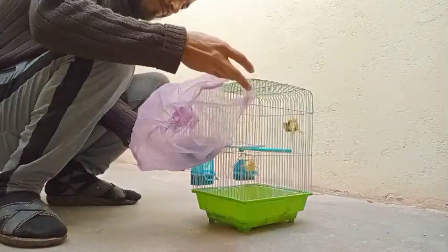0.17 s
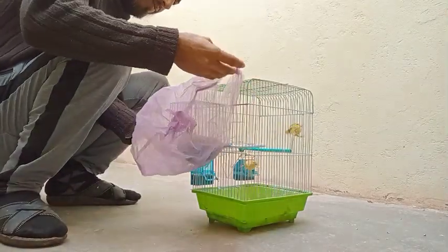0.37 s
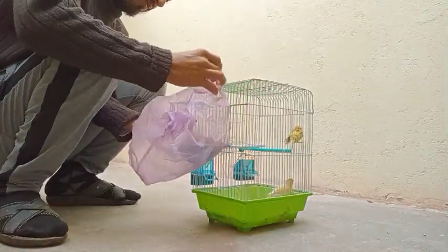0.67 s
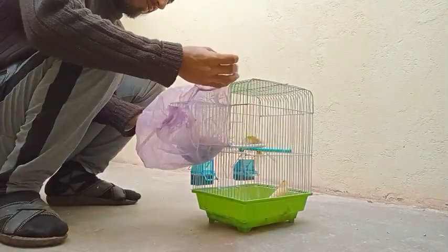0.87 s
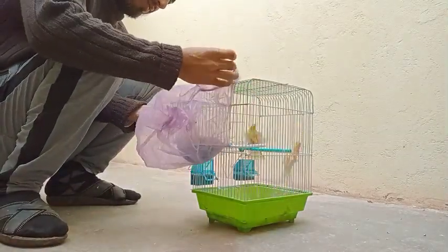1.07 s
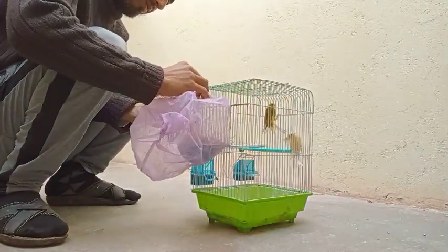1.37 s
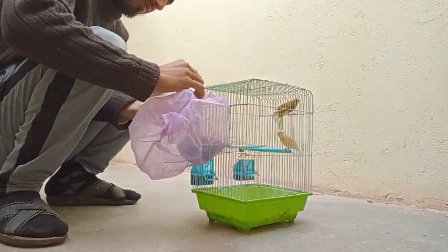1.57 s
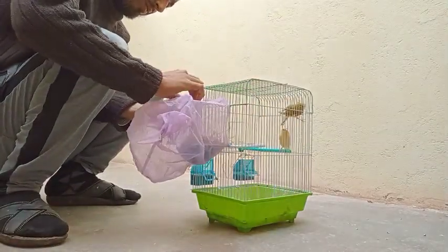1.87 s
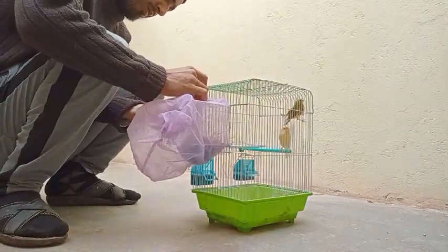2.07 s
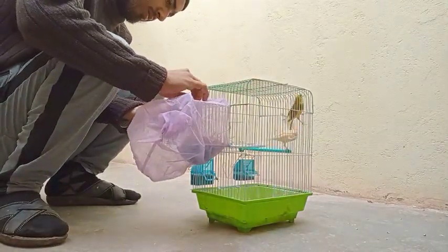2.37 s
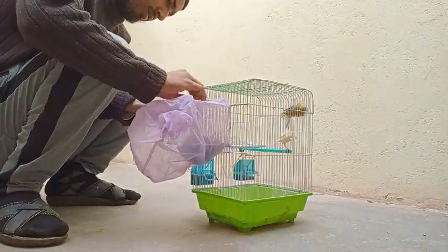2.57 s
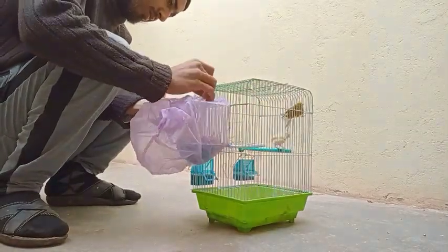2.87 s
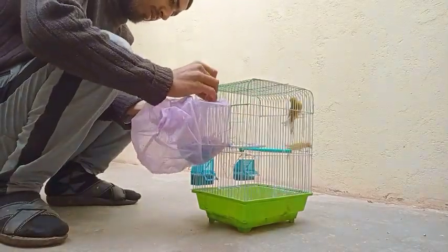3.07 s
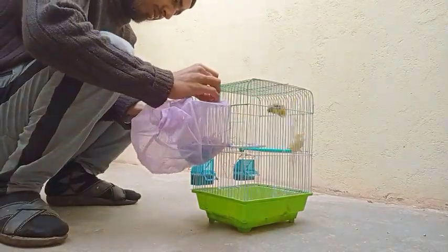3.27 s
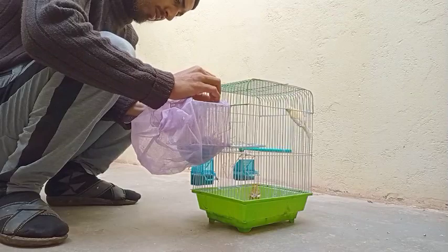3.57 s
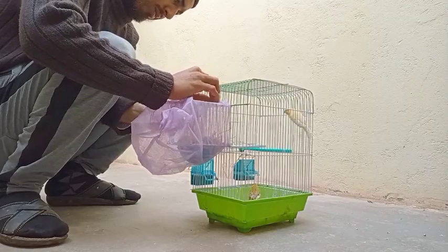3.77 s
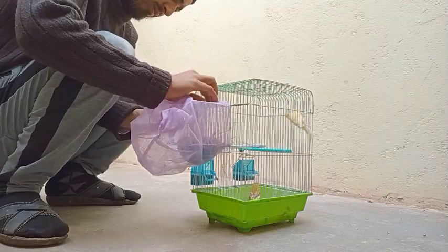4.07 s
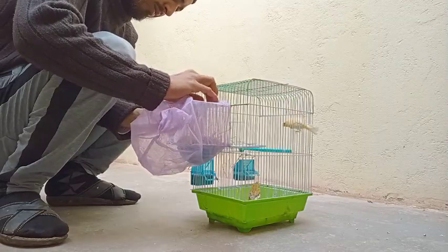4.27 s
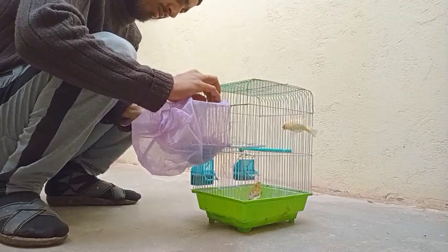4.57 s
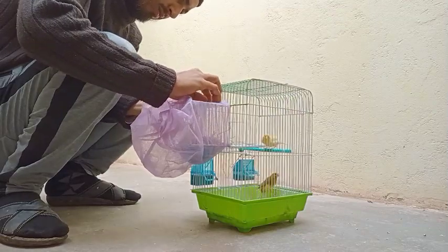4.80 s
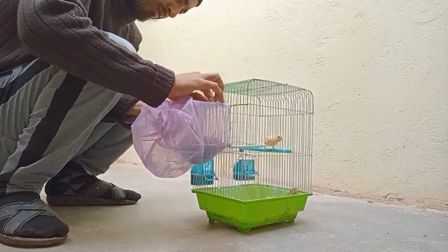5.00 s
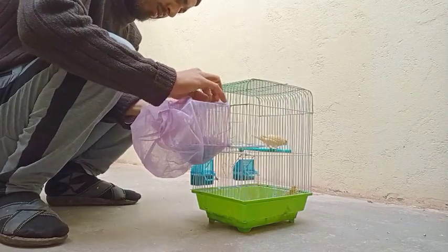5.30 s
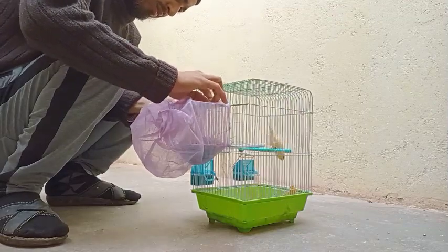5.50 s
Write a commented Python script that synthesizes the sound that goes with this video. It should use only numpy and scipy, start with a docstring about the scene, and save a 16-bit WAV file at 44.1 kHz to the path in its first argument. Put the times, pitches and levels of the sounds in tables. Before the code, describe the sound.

Two small finches move in a wire cage with a plastic tray, close to the microphone in a bare concrete corner with a short bright echo and very faint outdoor hush. A soft, low wing burst opens at once, with a faint hoarse climbing call and a tray knock at 0.1 s. After a brief lull, from 0.6 s wings flutter rapidly, claws knock plastic and wire, and thin bag film crackles with bright snaps, strongest around 0.9 to 1.4 s. A clear rising chirp sounds at 0.83 s. The flurry thins by 1.9 s. A steeply dropping squawk with overlapping notes comes at 2.1 s. Then light flutters, small taps and barely audible peeps, with a fuller flutter and knocks around 3.3 to 3.6 s. Quiet peeps continue at 4.3 and 4.75 s. A hard tray knock with a wing burst lands at 5.44 s, and another rising chirp ends it near 5.6 s.

```python
"""Two small finches in a wire cage with a plastic tray, in a bare concrete corner; a yard hushes faintly behind.
First a wing burst, a hoarse climbing call and knocks; from 0.6 s a flurry of wings, knocks and bright snaps, with
a rising call at 0.83 s. A steeply dropping squawk comes at 2.1 s, then mostly faint notes and lighter flutters;
a hard knock at 5.4 s and a last rising call end it. Calls are overtone stacks, wings are pulsed noise, knocks
ring cage modes, snaps are brief noise, and a thin bag on the door crackles as clumpy noise with pings."""
import sys
import numpy as np
from scipy import signal
from scipy.fft import rfft, irfft, next_fast_len
from scipy.io import wavfile
from scipy.ndimage import map_coordinates

SR = 44100
rng = np.random.default_rng(int(sys.argv[2]) if len(sys.argv) > 2 else 0)


def log_audio(samples):
    """Write samples as a 16-bit WAV file to the path given in sys.argv[1]."""
    # one column per channel
    frames = np.atleast_2d(samples).T
    # limit to full scale, then quantise
    limited = np.clip(frames, -1, 1)
    pcm = np.round(limited * 32767).astype(np.int16)
    wavfile.write(sys.argv[1], SR, pcm)


N = 248724

# Noise of the shaken cage, also the thud of a contact: f/Hz, density/(dB per Hz)
SHUDDER = [(120, -27), (280, 1), (500, 3), (750, -1), (1100, -3), (1400, -12), (2000, -44)]
# Noise of air through feathers, also the tick of a contact: f/Hz, density/(dB per Hz)
RUSH = [(1000, -16), (1600, -3), (2500, 1), (3800, -2), (5000, -16.5), (7000, -28)]
# Bright noise of thin film, also of the snaps: f/Hz, density/(dB per Hz)
CRACKLE = [(3500, -28), (5500, -4.5), (7000, -1), (9200, 4), (11500, -6.5), (15500, -23.5)]


def amp(db):
    """Gain of a level in dB."""
    return 10 ** (np.asarray(db) / 20)


def unit(x):
    """x at rms 1."""
    return x / np.sqrt(np.mean(x ** 2) + 1e-20)


def along(points, hz):
    """(Hz, value) points read on a log frequency axis."""
    f, value = np.transpose(points)
    return np.interp(np.log(hz + 1), np.log(f + 1), value)


def wobble(rate, count=N):
    """A smooth random curve with rate knots a second."""
    knots = rng.standard_normal(int(count * rate / SR) + 4)
    return map_coordinates(knots, [np.arange(count) * rate / SR])


def noise(count=N):
    """White noise."""
    return rng.standard_normal(count)


def filtered(x, response):
    """x times a response of frequency."""
    size = next_fast_len(len(x) + 8192)
    spectrum = rfft(x, size) * response(np.fft.rfftfreq(size, 1 / SR))
    return irfft(spectrum, size)[:len(x)]


def coloured(x, spectrum):
    """x through a spectrum, at rms 1."""
    return unit(filtered(x, lambda hz: amp(along(spectrum, hz))))


def walls(x, wet_db):
    """x and its echo: the near corner dies fast, farther walls linger, each frequency at its own speed."""
    # Decay of the near corner: f/Hz, T60/s
    corner_t60 = [(200, 0.2), (3000, 0.3), (8000, 0.29), (14000, .18)]
    hz, t, grains = signal.stft(noise(SR // 2), SR, nperseg=256)
    near_db = -60 * t / along(corner_t60, hz)[:, None]
    far_db = -13.5 + 0.61 * near_db
    tail = signal.istft(grains * (amp(near_db) + amp(far_db)), SR, nperseg=256)[1]
    tail /= np.linalg.norm(tail)
    delayed = np.pad(x, (150, 0))  # samples before the first echo
    return x + amp(wet_db) * signal.fftconvolve(delayed, tail)[:len(x)]


def chirps():
    """A gliding overtone stack through the throat; rough stretches shake in size and pitch."""
    # Throat gain: f/Hz, level/dB
    throat = [(1000, -39.5), (2000, -19.5), (2700, 7), (4300, 1.5), (5800, -7), (6500, -28), (7400, -15.5),
              (8600, -12.5), (11200, -15), (12500, -17.5), (14500, -24.5), (15500, -42), (30000, -82)]
    out, order = np.zeros(N + SR), np.arange(1, 6)[:, None]
    for start, hz, db, slope_db, rough in calls():
        count = len(hz)
        rough = np.clip(rough, .05, 1)
        hz = hz * (1 + .08 * rough * wobble(900, count))
        share = amp(along(throat, order * hz) + slope_db * (order - 1))
        # each overtone breaks up, the high ones most
        rasp = np.array([wobble(700, count) for _ in order])
        rasp_depth = np.minimum(1.1 * rough * order + 0.46 * (order - 1), 1.3)
        phase = 2 * np.pi * np.cumsum(hz) / SR
        tone = np.sum(share * (1 + rasp_depth * rasp) * np.sin(order * phase), axis=0)
        tone *= np.sqrt(2 / np.sum(share ** 2, axis=0))
        tone += 0.44 * rough ** 2 * coloured(noise(count), throat)  # air hisses past the membranes
        throb = 1 + 1.3 * rough * wobble(130, count)
        call = np.pad(amp(db) * throb * tone, (0, SR // 2))
        out[round(start * SR):][:len(call)] += walls(call, wet_db=-5.5)
    return out[:N]


def calls():
    """Paths of all calls and notes: (start s, pitch Hz, level dB, slope dB, roughness), mostly per sample."""
    # Shape of the rising call: t/s from its start, f/Hz, level/dB, slope/(dB per overtone), roughness/(0-1)
    rise_shape = [(0, 1330, -33, -2, .2), (.009, 1427, -15.5, -2.5, 0.29), (.028, 1805, -13.5, -7, 0.35),
                  (.045, 1988, -5.5, -10.5, .4), (.062, 2450, -12.5, -3, 0.26),
                  (.074, 2817, -1.5, -4.5, 0.14), (.088, 2980, -4, -10, .06), (.108, 3038, 2, -20.5, .05),
                  (.138, 3032, -22, -26, .05)]
    # Rising calls: start/s, level/dB added, slope/(dB per overtone) added
    rise_starts = [(.834, -31.5, 1), (5.598, -30.5, 1.5)]
    # A hoarse climb, then a squawk that drops steeply and holds: t/s in the scene, then columns as in the rise
    long_paths = [
        [(.018, 1400, -62, -15, .4), (.04, 1500, -56, -15, .3), (.064, 1650, -47, -15, .25),
         (.078, 2030, -54, -12, .45), (.088, 2120, -52, -14, .45), (.1, 2550, -48, -24, .4),
         (.12, 2900, -45, -24, .4), (.135, 3200, -49, -20, .35), (.175, 3000, -56, -20, .35)],
        [(2.135, 5200, -65, -12, .4), (2.14, 4100, -42, -12, .2), (2.143, 4000, -31, -12, .1),
         (2.147, 3500, -40, -3, .45), (2.151, 2800, -31, -1, .35), (2.164, 2800, -33, -1, .4),
         (2.174, 2930, -25, -5, .12), (2.187, 2990, -25, -4, .12), (2.194, 2900, -50, -4, .2)],
    ]
    # Short notes: start/s, length/s, first f/Hz, f neared/Hz, first level/dB, last level/dB,
    # slope/(dB per overtone), roughness/(0-1)
    short_notes = [(1.517, .08, 2943, 2844, -59.5, -73, -22, 0.56),
                   (2.187, 0.037, 3690, 3550, -29.5, -31.5, -3.5, .45),
                   (2.193, .027, 3920, 4160, -27, -24.5, -5.5, 0.5),
                   (2.576, 0.055, 2100, 1890, -77, -81, -38, .4),
                   (3.09, 0.066, 3000, 3040, -71, -70.5, -26.5, 0.36),
                   (3.368, 0.0675, 2950, 2830, -65.5, -62, -30, .4),
                   (3.752, 0.043, 2350, 2606, -58.5, -66, -37, 0.37),
                   (4.277, .052, 3334, 3640, -53.5, -57, -20, 0.24),
                   (4.336, 0.0404, 3460, 3478, -44.5, -56, -21, .19),
                   (4.687, 0.051, 2790, 3150, -65.5, -36, -9.5, 0),
                   (4.691, 0.062, 3368, 3388, -61.5, -56.5, -2.5, 0.26),
                   (4.756, 0.13, 3170, 3201, -44, -50, -9, 0.2),
                   (5.343, .068, 3385, 3756, -52.5, -50, -6.5, 0.2),
                   (5.413, 0.048, 3396, 3590, -46.5, -44, -25, 0.19)]
    edge_s, glide_share = .004, .33  # fade in and out; the glide slows by 1/e over this share of the length

    def per_sample(s, *columns):
        grid = np.arange(s[0], s[-1], 1 / SR)
        return [s[0], *(np.interp(grid, s, column) for column in columns)]

    s, hz, db, slope_db, rough = np.transpose(rise_shape)
    found = [per_sample(start + s, hz, db + level_db, slope_db + tilt_db, rough)
             for start, level_db, tilt_db in rise_starts]
    found += [per_sample(*np.transpose(path)) for path in long_paths]
    for start, length, first_hz, last_hz, first_db, last_db, slope_db, rough in short_notes:
        t = np.arange(0, length, 1 / SR)
        edge_db = 20 * np.log10(np.clip(np.minimum(t, length - t) / edge_s, 1 / 100, 1))
        hz = last_hz + (first_hz - last_hz) * np.exp(-t / (glide_share * length))
        db = first_db + (last_db - first_db) * t / length + edge_db
        found.append([start, hz, db, slope_db, np.full(len(t), rough)])
    return found


def flutter(push_db, shudder_db, rush_db):
    """Each stroke pushes air, shakes the cage and rushes through the feathers."""
    # Low noise of the pushed air: f/Hz, density/(dB per Hz)
    push_spectrum = [(25, -17), (60, -9), (110, -0.5), (220, -1), (400, -19.5), (800, -41.5)]
    beat_hz = 21.08 * (1 + .15 * wobble(6.7))  # wing strokes a second, drifting
    phase = np.cumsum(beat_hz) / SR % 1

    def air(depth_db):
        """Noise with a sharp downstroke and a fading recovery."""
        return amp(-depth_db * phase + 1.4 * wobble(60)) * noise()

    push = coloured(air(depth_db=6), push_spectrum)
    shudder = coloured(air(depth_db=4.5), SHUDDER)
    rush = coloured(walls(air(depth_db=5.5), wet_db=-6.5), RUSH)
    return amp(push_db) * push + amp(shudder_db + 2.0) * shudder + amp(rush_db + 3.5) * rush


def bursts():
    """Levels in dB of push, shudder, rush and crackle: each burst leaps in, swells, holds and fades."""
    # Wing bursts: start/s, swell/s, hold/s, fade speed/x, push level/dB, shudder level/dB, rush level/dB,
    # crackle level/dB; shudder and rush stand before the trims in flutter()
    wing_bursts = [(-.02, 0.022, 0.17, 1.07, -53.5, -53.5, -56, -61.5),
                   (.615, 0.018, 0.054, 1.35, -89, -65, -68, -75),
                   (.81, .02, 0.011, 1.1, -92, -72, -78, -79),
                   (0.852, 0.056, 0.023, 0.743, -52, -54, -56.5, -60),
                   (1.08, 0.029, 0.0042, 1.5, -67, -75.5, -65, -72),
                   (1.134, 0.0061, 0.0172, 0.92, -55.5, -50, -53.5, -58),
                   (1.199, 0.0177, 0.018, 1.14, -54, -67, -59.5, -67),
                   (1.322, 0.031, .01, 1.8, -62, -53.5, -63, -77.5),
                   (1.463, 0.061, 0.029, 1.4, -67, -64.5, -67, -71),
                   (1.706, .03, 0.0154, 1.1, -90, -79, -81, -77),
                   (1.741, 0.067, 0.028, 1.5, -62, -65.5, -66, -73),
                   (2.192, .05, 0.028, 1.01, -72.5, -67.5, -74, -93),
                   (2.398, 0.0103, 0.0089, 1.2, -82.5, -84, -89.5, -72),
                   (2.431, 0.019, 0.0133, 0.99, -74.5, -71.5, -74, -76.5),
                   (2.583, 0.076, 0.022, 1.2, -85, -72.5, -75, -84.5),
                   (2.703, 0.026, 0.006, 1.07, -84.5, -82, -87, -84.5),
                   (2.845, 0.0102, 0.013, 1.22, -92.5, -83, -90, -82),
                   (2.936, 0.011, 0.054, 1.3, -71.5, -66, -69.5, -78),
                   (3.087, 0.035, 0.031, 1.6, -72.5, -72, -70.5, -80.5),
                   (3.294, 0.0234, .05, .9, -64.5, -65.5, -68, -75),
                   (3.365, 0.036, 0.025, 0.46, -59, -57.5, -63.5, -69.5),
                   (3.467, 0.027, 0.073, 1.7, -65.5, -57.5, -57.5, -63.5),
                   (3.887, 0.0055, .01, 1.9, -75.5, -69.5, -72.5, -88.5),
                   (4.165, 0.019, 0.0277, 0.47, -78.5, -71, -76.5, -82.5),
                   (4.34, 0.033, 0.026, 0.92, -73.5, -73, -73.5, -77.5),
                   (4.794, 0.021, 0.05, 1.17, -69.5, -62.5, -63, -69.5),
                   (4.95, 0.17, 0.017, 1.5, -79, -73, -74, -79),
                   (5.066, 0.0176, 0.0079, 0.89, -74.5, -64, -71.5, -93.5),
                   (5.283, 0.0093, .01, 1.5, -91.5, -76, -77.5, -80.5),
                   (5.335, 0.0283, .05, 0.98, -74, -63, -71, -81),
                   (5.438, 0.013, 0.01, 1.62, -59, -53.5, -56, -58.5),
                   (5.604, 0.0175, 0.061, 0.95, -72, -63.5, -63.5, -66)]
    # Fade at speed 1 of push, shudder, rush, crackle: rate/(dB per s)
    fade_rates = [124, 89.1, 124.2, 220]
    # The same four between bursts, before the same trims: level/dB
    rest_levels = [-85.5, -80, -85.5, -102]
    leap_s, swell_db = .008, 9
    grid = np.arange(0, N / SR + 1, 1 / 1000)  # seconds, in steps of 1 ms
    power = amp(rest_levels)[:, None] ** 2 * np.ones(len(grid))
    for start, swell, hold, speed, *peaks_db in wing_bursts:
        marks = start + np.cumsum([-leap_s, leap_s, abs(swell), abs(hold), 1])
        shape_db = [np.interp(grid, marks, [-60, -swell_db, 0, 0, -rate * speed]) for rate in fade_rates]
        power = power + amp(np.array(peaks_db)[:, None] + shape_db) ** 2
    return [np.interp(np.arange(N) / SR, grid, 10 * np.log10(p)) for p in power]


def knocks():
    """A contact rings the tray and wire modes nearest the spot, with a dull thud, short tick and bright snap."""
    # Claws and wings on the cage: t/s, level/dB, tray spot f/Hz, wire spot f/Hz, wire level/dB, tick level/dB;
    # the wire level is relative to the tray, the tick level to the contact
    contacts = [(0.115, -36, 520, 824, -16, -6), (0.616, -53.5, 544, 1050, -11.5, -5),
                (.675, -47, 520, 796, -10, -24), (.844, -53.5, 565, 935, -2, 7.5),
                (0.901, -40.5, 169, 773, -13, -12.5), (.953, -35.5, 395, 725, -15, -5),
                (1.136, -33.5, 170.6, 1075, -14, -14), (1.171, -36.5, 165, 729, -16, -6.5),
                (1.227, -43.5, 153, 834, -8, -10), (1.347, -36.5, 300, 703, -10.5, -22),
                (1.51, -59, 412, 866, -17.5, -11), (1.578, -46.5, 467, 1150, -19, -17),
                (1.767, -50.5, 176, 760, -11, -6.5), (1.824, -47.5, 497, 1070, -9, 0.5),
                (1.94, -58, 500, 1100, -16, -22.5), (2.244, -50, 552, 920, -15, -13.5),
                (2.437, -42.5, 327, 960, -9.5, -18), (2.649, -57, 525, 920, -0.5, -18),
                (2.765, -59, 484, 1190, -20, -20.5), (2.946, -56, 597, 942, 1.53, 0),
                (3.018, -61.5, 484, 920, 2, -14.5), (3.123, -54, 522, 1030, -4, -16),
                (3.295, -54.5, 260.5, 1130, -13, -8), (3.399, -44.5, 525, 1140, -12, -9),
                (3.458, -44.5, 336, 735, -3, 3.5), (3.505, -43, 321, 1020, -3, -2),
                (3.556, -43.5, 395, 1020, -15, -2.5), (3.894, -43.5, 510, 840, -14, -20),
                (4.185, -50, 490, 1066, -11, -20.5), (4.354, -60, 454, 717, 8, 2.5),
                (4.41, -57.5, 535, 764, 1, -28), (4.807, -59.5, 523, 1130, 6, 8.5),
                (4.879, -48, 447, 820, -6, -17), (5.077, -51.5, 533, 1120, -5.5, -11.5),
                (5.354, -56, 477, 790, 5.5, -5.5), (5.444, -33, 562.4, 820, -37, -30)]
    # Modes of tray and wires: f/Hz, level/dB
    cage_modes = [(175, -4), (215, -1), (270, -2), (320, -5.5), (375, -4.5), (430, -1.5), (490, -1.5),
                  (545, -7), (600, -9), (780, 1), (885, 1), (964, -0.5), (1070, 0.5), (1145, 3.5)]
    ring_t60, thud_t60, tick_t60, snap_t60 = .135, 0.035, .035, 0.0174  # s
    out, t = np.zeros(N + SR), np.arange(SR // 5) / SR
    count = len(t)
    hz, mode_db = np.transpose(cage_modes)[:, :, None]

    def near(spot_hz):
        """Modes weaken by 36 dB per octave away from the spot."""
        return amp(-36 * np.abs(np.log2(hz / spot_hz)))

    for start, db, tray_hz, wire_hz, wire_db, tick_db in contacts:
        chance, turn = rng.standard_normal((2, len(hz), 1))
        strength = amp(mode_db + 0.5 * chance) * (near(tray_hz) + amp(wire_db) * near(wire_hz))
        # loose joints buzz, so no mode rings evenly
        rattle = amp(2.9 * np.array([wobble(45, count) for _ in hz]))
        ring = np.sum(strength * rattle * np.sin(2 * np.pi * hz * t + 2 * turn), axis=0)
        ring *= amp(-4.0 - 60 * t / ring_t60)
        ring *= 1 - np.exp(-t / .002)  # the ring fades in over about 2 ms, under the sharper tick
        thud = coloured(noise(count), SHUDDER) * amp(-10 - 60 * t / thud_t60)
        tick = coloured(noise(count), RUSH) * amp(tick_db - 60 * t / tick_t60)
        snap = coloured(noise(count), CRACKLE) * amp(tick_db - 13.5 - 60 * t / snap_t60)
        blow = np.pad(amp(db) * (ring + thud + tick + snap), (0, count))
        out[round(start * SR):][:len(blow)] += walls(blow, wet_db=-3.5)
    return out[:N]


def snaps():
    """Short bright snaps, many of them with the knocks: a brief treble noise burst each."""
    # Bright snaps: t/s, nominal peak level/dB before the echo
    bright_snaps = [(0.2358, -51.5), (0.5053, -66), (0.9033, -45.5), (0.9542, -37.5), (1.077, -41),
                    (1.1049, -58), (1.1706, -33.5), (1.1935, -47), (1.2244, -54), (1.6387, -58),
                    (2.4129, -66), (3.0779, -57), (3.2568, -68.5), (3.3493, -59), (4.373, -61.5),
                    (4.8085, -48), (4.8274, -56.5), (4.8698, -53), (5.1779, -55.5)]
    crest_db, t60 = 14, 0.017  # peak of a snap over its rms; decay in s
    t, level = np.arange(N) / SR, np.zeros(N)
    for start, db in bright_snaps:
        level += (t >= start) * amp(db - crest_db - 60 * np.abs(t - start) / t60)
    return walls(level * coloured(noise(), CRACKLE), wet_db=-4.5)


def bag(level_db):
    """Thin film stirred with the wing bursts: a clumpy hiss with tiny snaps and pings."""
    struck = rng.random(N) < 700 / SR  # about 700 tiny snaps a second
    tiny_snaps = struck * amp(2.5 * rng.exponential(size=N)) * noise()
    hiss = amp(3.8 * wobble(90)) * noise()
    film = unit(hiss) + .6 * unit(tiny_snaps) + amp(-8) * pings()
    return amp(level_db) * coloured(film, CRACKLE)


def pings():
    """Small taut panels of the film ring briefly: short fuzzy treble tones, rms 1."""
    pings_per_s, t60 = 45, .05
    count, t = round(pings_per_s * N / SR), np.arange(SR // 10) / SR
    at, pitch, size = rng.random((count, 3)).T[:, :, None]
    hz = 4800 * 3 ** pitch
    envelope = amp(12 * size - 60 * t / t60) * (1 - np.exp(-t / .003))
    tones = envelope * np.sin(2 * np.pi * hz * t)
    where = (at * N).astype(int) + np.arange(len(t))
    together = np.bincount(where.ravel(), tones.ravel(), N + SR)[:N]
    return unit(together * (1 + .8 * wobble(400)))


def yard():
    """A faint, slowly wavering outdoor hush of filtered noise."""
    # Distant outdoor hush: f/Hz, density/(dB per Hz)
    hush_spectrum = [(15, -35), (25, -9.5), (48, -3.5), (508, 2), (665, -6.5), (1140, -12), (1570, -9),
                     (2920, -6), (5720, -26.5), (9530, -17), (15500, -38.5)]
    return amp(-79.5 + 1.5 * wobble(0.96)) * coloured(noise(), hush_spectrum)


def scene():
    """All sources at one microphone."""
    push_db, shudder_db, rush_db, crackle_db = bursts()
    birds = chirps() + flutter(push_db, shudder_db, rush_db)
    contacts = knocks() + snaps()
    return (birds + contacts + bag(crackle_db) + yard())[None]


def record(dry):
    """The phone microphone keeps nothing above its band limit."""
    top_hz, slope_hz = 15600, 150  # the gain falls to zero over the last 150 Hz
    return filtered(dry[0], lambda hz: np.clip((top_hz - hz) / slope_hz, 0, 1))[None]


dry = scene()
out = record(dry)
log_audio(out)
```